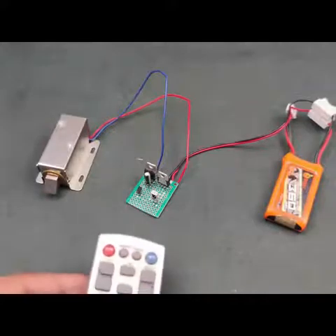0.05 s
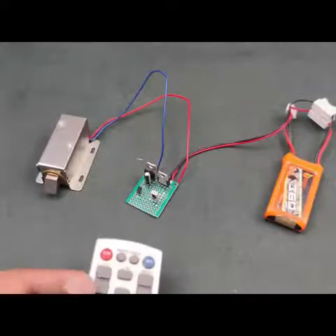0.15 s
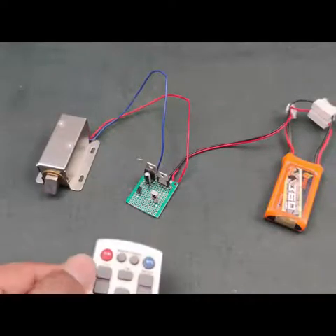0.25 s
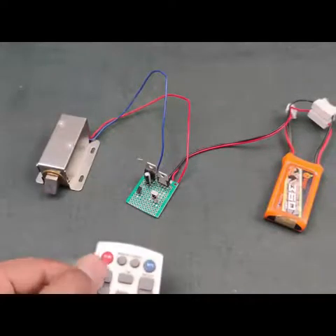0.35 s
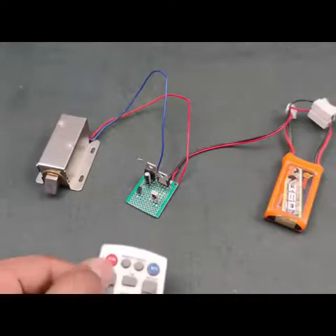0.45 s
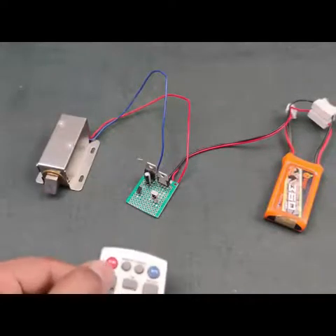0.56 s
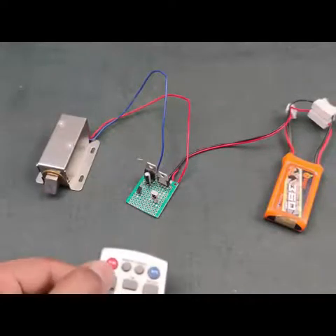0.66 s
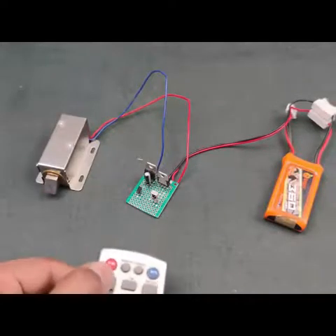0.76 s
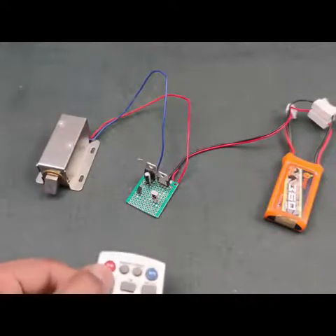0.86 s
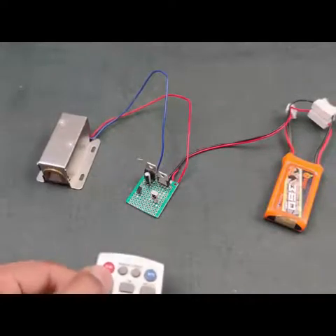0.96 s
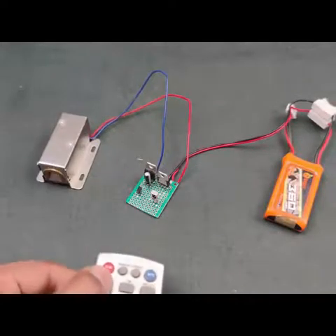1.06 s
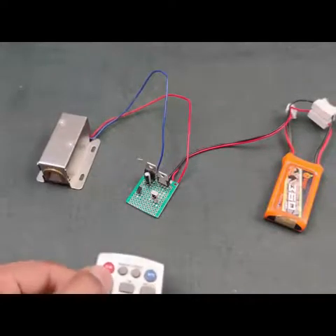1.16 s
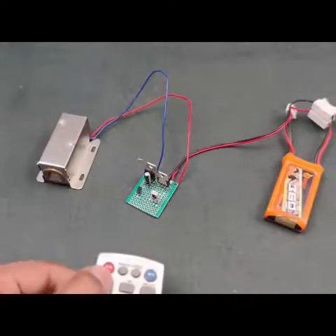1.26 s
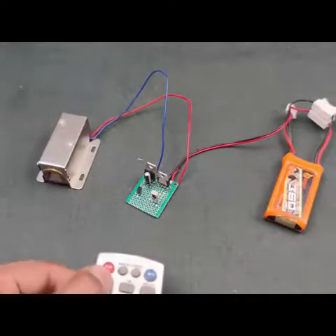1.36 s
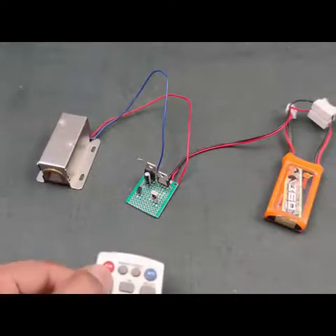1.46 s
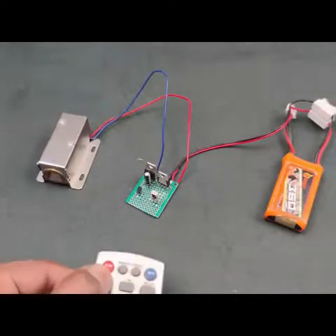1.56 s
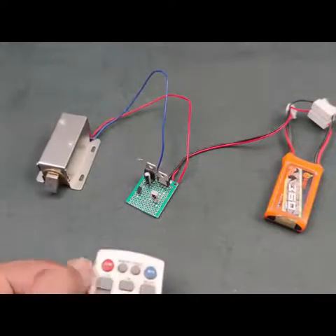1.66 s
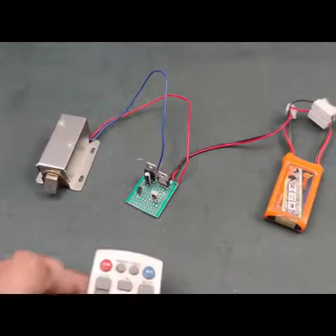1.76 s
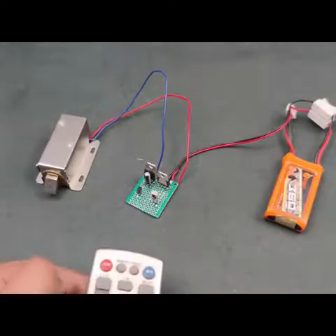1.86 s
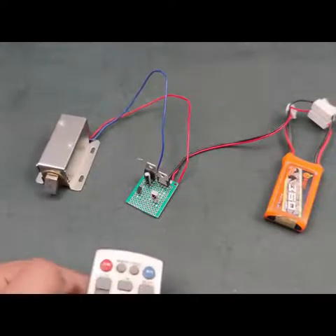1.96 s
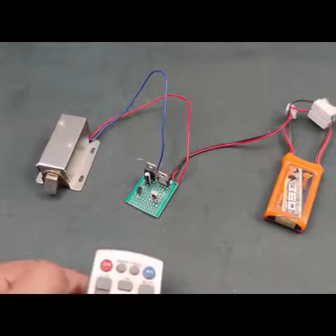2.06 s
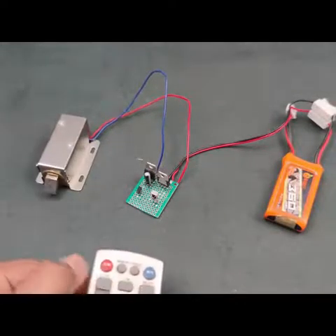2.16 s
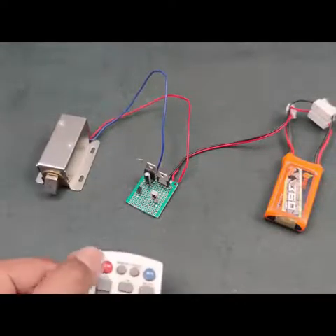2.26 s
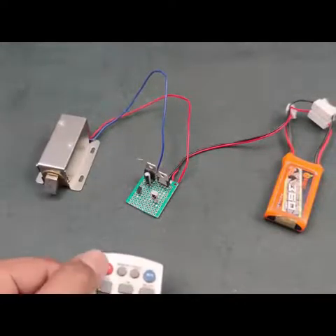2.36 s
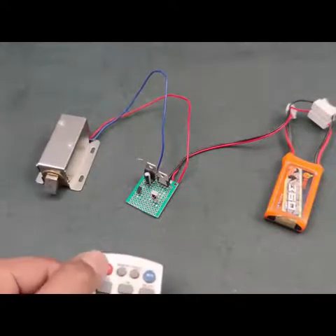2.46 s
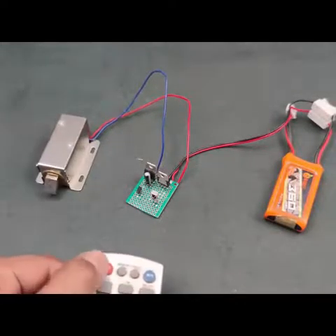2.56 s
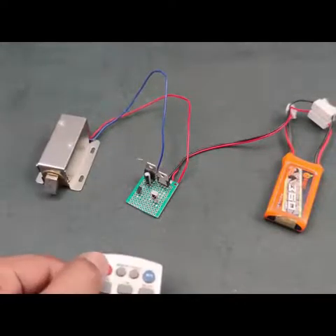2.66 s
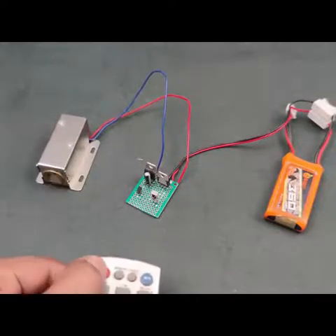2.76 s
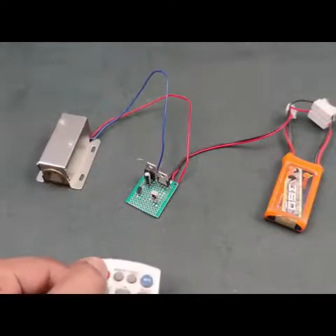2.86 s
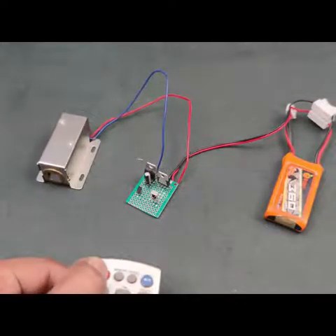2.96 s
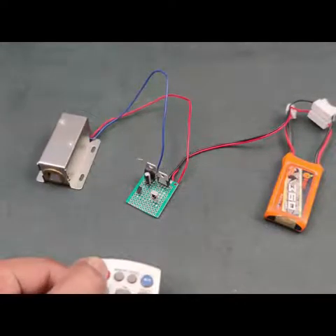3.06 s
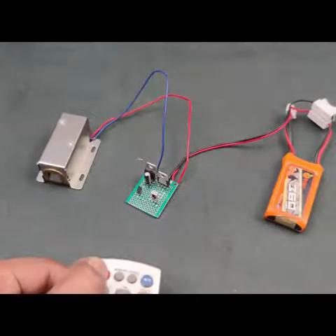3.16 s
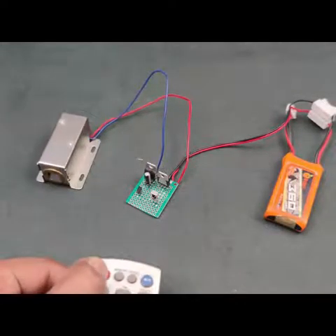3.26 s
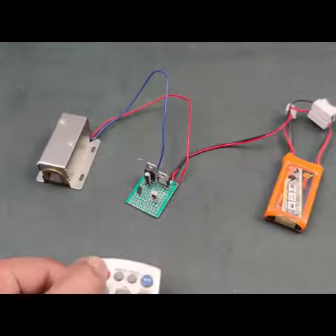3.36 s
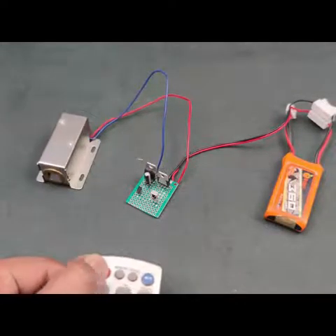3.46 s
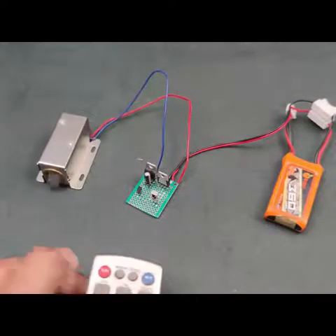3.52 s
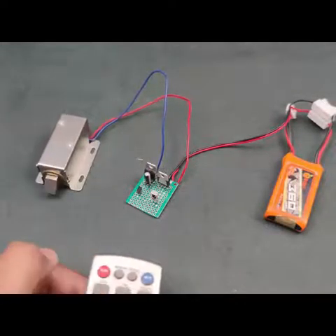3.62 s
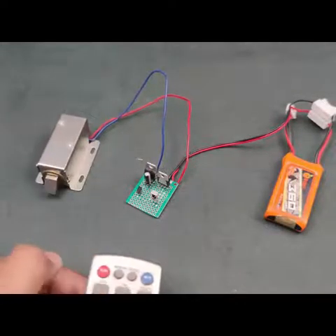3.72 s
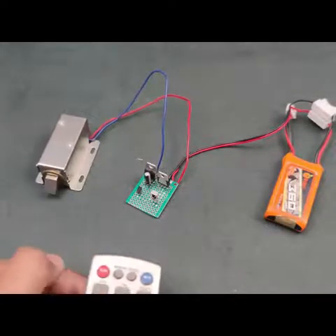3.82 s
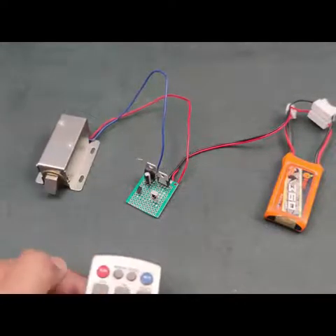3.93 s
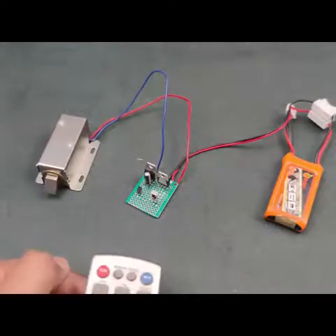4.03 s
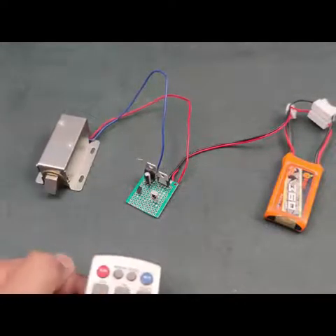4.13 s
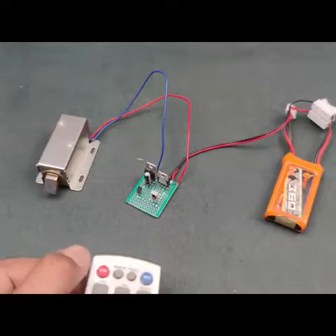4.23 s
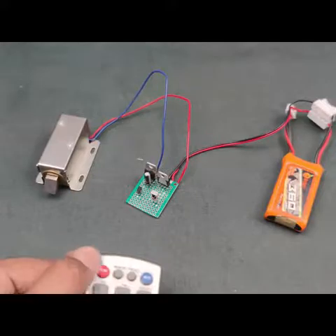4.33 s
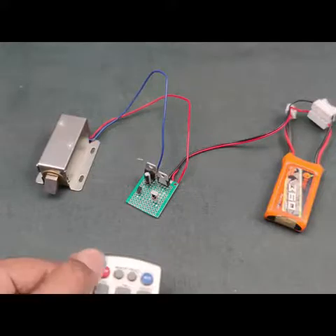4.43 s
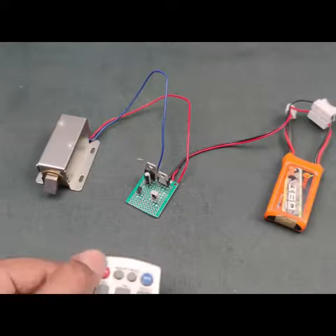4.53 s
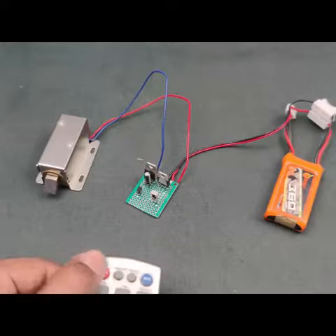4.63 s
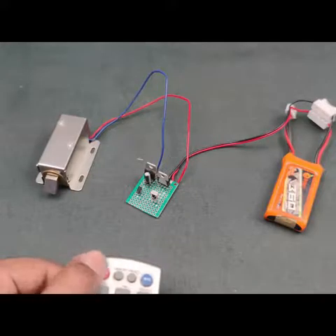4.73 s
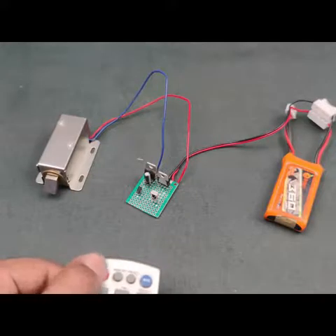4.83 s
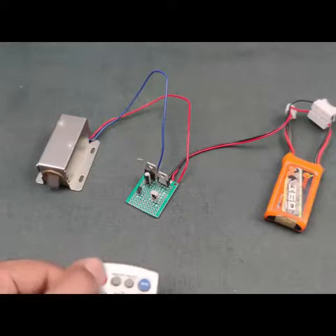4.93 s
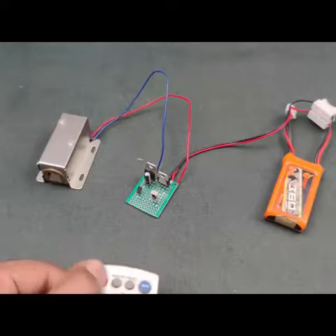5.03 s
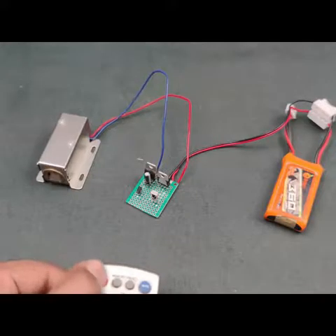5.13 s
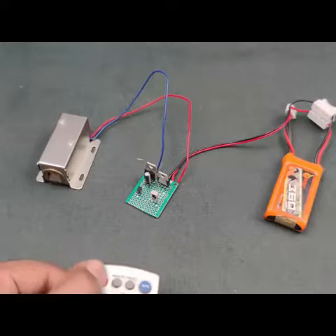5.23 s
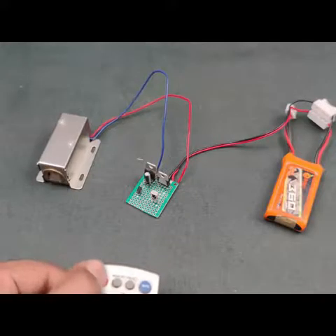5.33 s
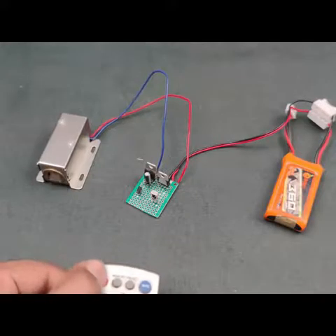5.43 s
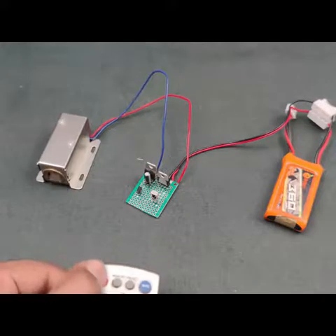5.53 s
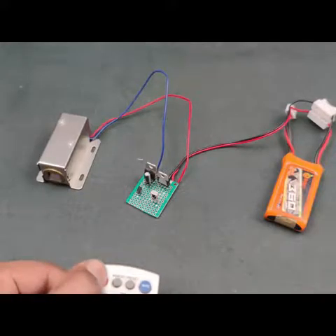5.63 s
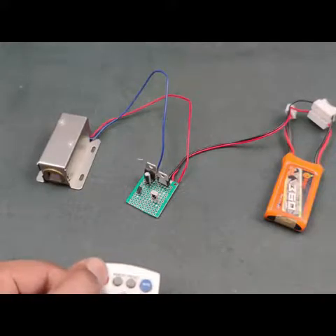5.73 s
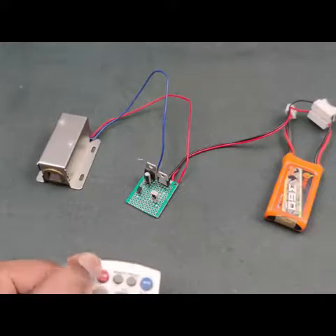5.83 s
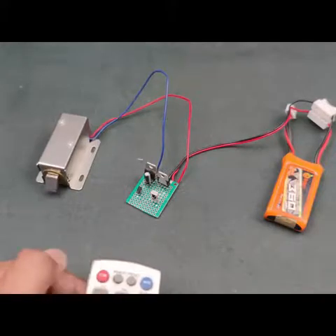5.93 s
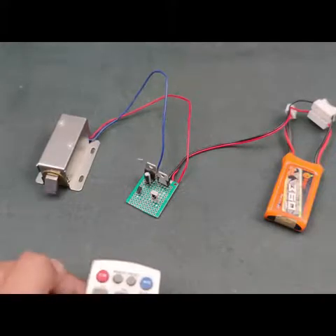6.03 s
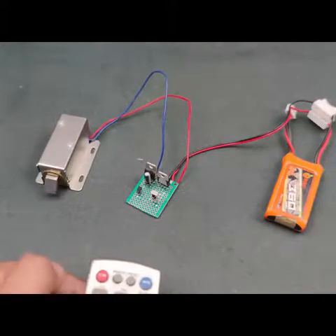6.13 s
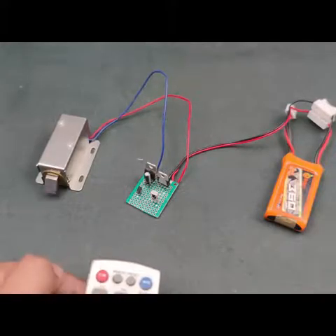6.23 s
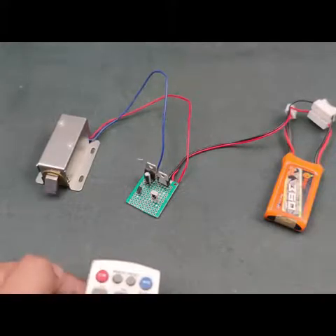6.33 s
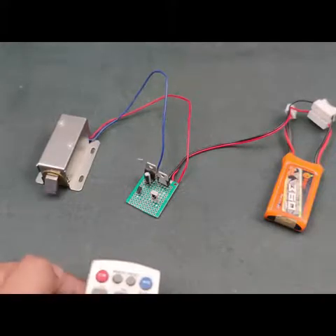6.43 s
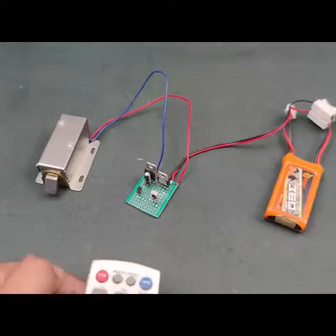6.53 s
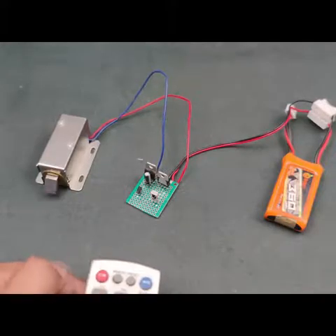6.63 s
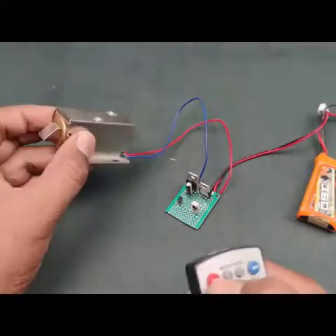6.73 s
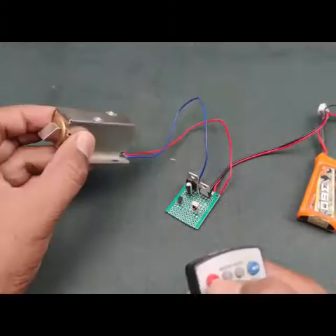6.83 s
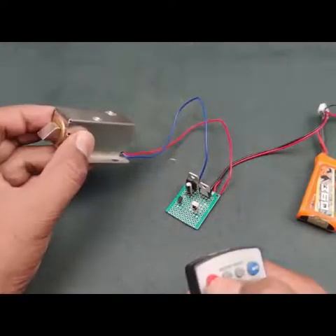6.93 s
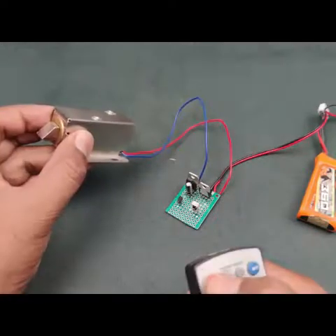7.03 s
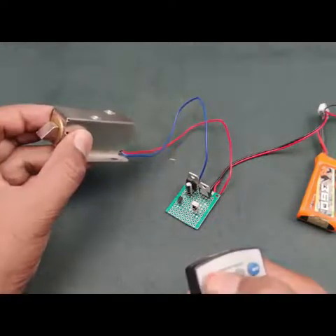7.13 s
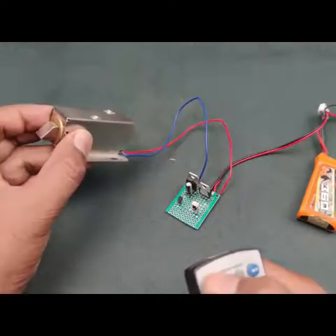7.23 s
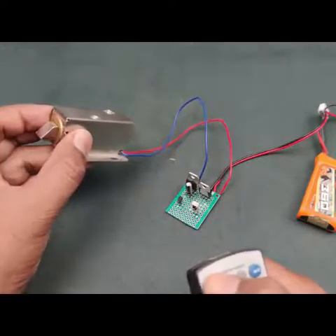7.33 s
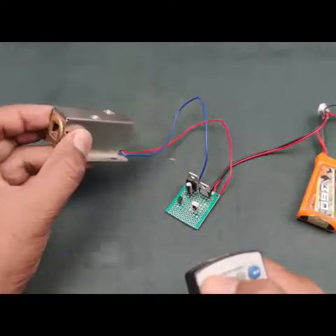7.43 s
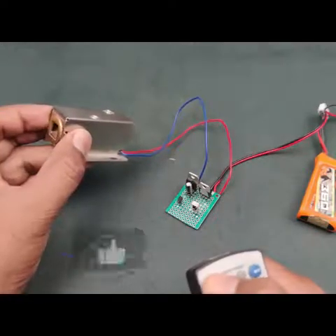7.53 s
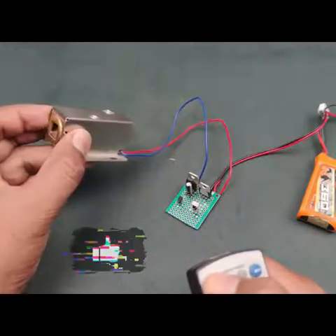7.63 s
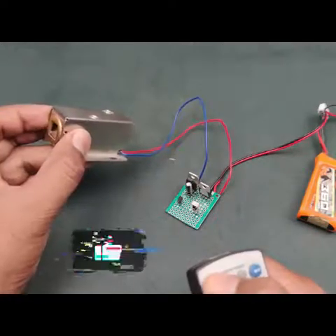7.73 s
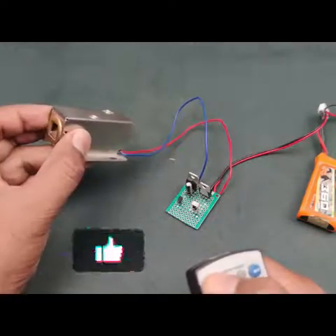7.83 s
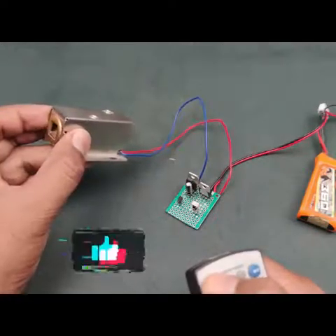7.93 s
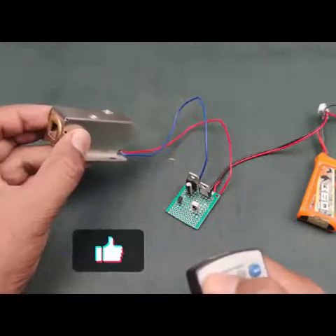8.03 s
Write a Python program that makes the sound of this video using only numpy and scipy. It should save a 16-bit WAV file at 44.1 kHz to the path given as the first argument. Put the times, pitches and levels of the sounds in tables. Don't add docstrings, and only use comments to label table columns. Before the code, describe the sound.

A small steel solenoid bolt clacks sharply in and springs back with a bouncing rattle, three times on a bench, then once more in the hand.

```python
import sys
import numpy as np
from scipy import signal
from scipy.fft import rfft, irfft, next_fast_len
from scipy.io import wavfile
from scipy.ndimage import uniform_filter1d, map_coordinates

SR = 44100
rng = np.random.default_rng(int(sys.argv[2]) if len(sys.argv) > 2 else 0)


def bounce(signal):
    frames = np.transpose(np.atleast_2d(signal))
    limited = np.clip(frames, -1, 1)
    pcm = np.round(limited * 32767).astype(np.int16)
    wavfile.write(sys.argv[1], SR, pcm)


def voltage_ratio(decibels):
    exponent = np.asarray(decibels, float) / 20
    return 10 ** exponent


N = 356328

# time in s, level in dB.
PULLS = [
    (1.0128, -9.5),
    (2.89, -9.5),
    (5.065, -9.5),
]
# time in s, level in dB, relative flight time of the bounces.
BACKS = [
    (1.788, -14.5, 1.08),
    (3.669, -14, .98),
    (6.0654, -14.5, .97),
]
# time in s, level in dB.
HELD_PULL = [(7.5483, -9)]

# time from the slam in s, steel in dB relative to it,
# bench in dB over steel, chatter length in ms.
PULL_CONTACTS = [
    (-.034, -37, -1, 6.5),
    (0, 0, -5.5, 7),
    (.0096, -10, -2, 5),
]
BACK_CONTACTS = [
    (0, 0, -1, 5),
    (.0092, -8.5, 2, 6),
    (.027, -17.5, 12, 8),
]
RELEASE_CONTACTS = [(-.0155, -19.5, -7, 5)]
HELD_CONTACTS = [
    (-.0223, -49, -14.5, 5),
    (0, 0, -32.5, 6.8),
]

# (start, stop) in s from the slam, steel in dB relative to it,
# bench in dB relative to it, delay of the steel in ms.
PULL_SLIDE = ((-.0395, .0045), -53, -40.5, 1.5)
BACK_SLIDE = ((-.026, .001), -26, -33, 10)
HELD_SLIDE = ((-.03, -.003), -44, -62, 1.5)

# frequency in Hz, width in Hz, level in dB.
PULL_MODES = [(2270, 59, -4.5), (2590, 300, -5.5), (3100, 200, -9), (3655, 400, -3.5), (4160, 250, -7.5),
              (4550, 75, -6), (4970, 370, -0.5), (5340, 130, -5), (5820, 170, -6.5), (6590, 300, -4),
              (7400, 86, -8.5), (8250, 1200, -1.5), (9500, 310, -6), (9300, 250, -6.5), (10250, 400, -8),
              (11500, 660, -10), (12500, 200, -9.5), (12900, 300, -11.5), (13500, 500, -11.5),
              (15200, 300, -14)]
# frequency in Hz, width in Hz, level in dB.
BACK_MODES = [(2300, 140, -3.5), (2560, 130, -1.5), (2980, 300, -3.5), (3600, 200, -12), (4100, 360, -10),
              (4930, 200, -5.5), (5572, 100, 0), (6750, 280, -19), (7900, 230, -12), (8200, 370, -10),
              (8800, 250, -13), (9850, 450, -14), (11400, 790, -15), (12200, 400, -18), (13300, 400, -20.5),
              (14600, 400, -28)]
# frequency in Hz, width in Hz, level in dB.
HELD_MODES = [(950.7, 140, -12.5), (1540, 260, -17.5), (2140, 510, -16), (2710, 220, -19), (3300, 140, -17),
              (3965, 220, -1.5), (4800, 360, -6.5), (5530, 130, -6), (6000, 210, -5), (6500, 200, 0),
              (7640, 170, -6), (8103, 110, 0), (8760, 210, -0.5), (8900, 200, -2.5), (9600, 320, -5),
              (10150, 490, -6), (10900, 300, -16), (12160, 590, -7.5), (13300, 490, -12.5),
              (14100, 320, -6.5), (14900, 220, -20)]
# frequency in Hz, width in Hz, level in dB.
SPRING_MODES = [(3600, 800, -19), (4870, 330, -2), (5730, 400, -3.5), (8300, 1200, -8), (11200, 1600, -10),
                (13500, 1500, -13.5)]
# frequency in Hz, width in Hz, level in dB.
BENCH_MODES = [(160, 41, -14.5), (308, 32, -5.5), (310, 15, -9), (434, 13, -3.5), (617, 55, -4),
               (731, 70, 3), (825, 34, 2), (1126, 99, -3.5), (1326, 49, -12.5), (1612, 99, -4),
               (1820, 130, -7)]
# frequency in Hz, width in Hz, depth from 0 to 1.
PULL_GAPS = [(3430, 150, 0.99), (4430, 120, .6), (6080, 250, .4), (3075, 110, 0.7), (7070, 300, 0.8),
             (10600, 140, 1)]
# frequency in Hz, width in Hz, depth from 0 to 1.
BACK_GAPS = [(2125, 350, .7), (3750, 90, 0.98), (4620, 130, .5), (5900, 260, 0.43), (5250, 91, 0.4),
             (6900, 350, 0.47)]
# frequency in Hz, width in Hz, depth from 0 to 1.
HELD_GAPS = [(1286, 340, .7), (4520, 110, .4), (5416, 150, 0.67), (6640, 140, 0.97), (11100, 200, .5)]
# frequency in Hz, level after a pull in dB,
# level after a spring back in dB, t60 in s.
LOW_MODES = [(66, -52, -63, 1.1), (88.5, -51.5, -58.5, .9), (93, -46, -46.5, 1.1), (111.7, -50, -45, 1.4),
             (135.7, -48, -49.5, .8), (170, -49, -54.5, 0.43), (187, -54, -54.5, 0.85),
             (210, -51, -46, 0.86)]

# time in s, level in dB, thud in dB over the tick, chatter length in ms.
KEY_TICKS = [(.849, -69, 3.5, 4), (.42, -57, -5.5, 8.4), (.91, -54.5, -7, 4.3), (1.71, -67.5, 6.5, 3.7),
             (2.415, -67.5, 9.5, 4), (2.796, -53.5, -6.5, 4), (4.969, -66.5, -1.5, 4),
             (5.971, -59.5, -2.5, 4.03), (7.474, -54, 7, 4.9)]
# frequency in Hz, width in Hz, level in dB.
KEY_MODES = [(2620, 200, -3), (2860, 170, -1), (5590, 110, -7), (5800, 110, -11.5), (7700, 200, -2.5),
             (8760, 360, -8.5), (10100, 190, -12)]
# time in s, level in dB, thud in dB over the tap, chatter length in ms.
TAPS = [
    (6.747, -56.5, -8.5, 5.6),
    (6.753, -49.5, -14, 7.9),
]
# frequency in Hz, width in Hz, level in dB.
TAP_MODES = [(1400, 260, -4.5), (2500, 120, 3.5), (3190, 200, -10), (4130, 310, -7), (5430, 270, -6.5),
             (8200, 680, -12), (12000, 1800, -26)]
# start in s, hold in s, level in dB, time to fall 15 dB in s.
STROKES = [
    (.01, .17, -63.5, 0.58),
    (0.424, .11, -62, 0.02),
    (2.64, .14, -74, 0.9),
]
# frequency in Hz, density in dB per Hz.
SKIN_SPECTRUM = [(120, -43), (200, -13.5), (339, 5), (392, -20.5), (446, -8), (677, -9.5), (1260, -10),
                 (4580, -22.5), (7000, -32), (8400, -20), (15500, -32.5)]

# frequency in Hz, t60 in s.
WALL_T60 = [(120, 0.71), (300, 0.62), (1500, 0.63), (6000, .55), (12000, 0.44)]
# frequency in Hz, level in dB.
WALL_TONE = [(100, -2.5), (300, 0), (800, -4), (2000, 8.5), (5000, -2.5), (9000, 0), (15000, -5.5)]
# frequency in Hz, correlation from -1 to 1.
PORT_LIKENESS = [(60, 1), (180, 1), (550, 0.69), (1650, -0.56), (4970, -0.1), (15000, 0.32)]
# frequency in Hz, density in dB per Hz.
HUSH_SPECTRUM = [(12, -33.5), (20, -6.5), (96, -3), (200, -10), (340, -13.5), (750, -19.5), (1400, -23.5),
                 (2500, -27), (5000, -34.5), (6800, -40.5), (8300, -35.5), (10500, -34.5), (13500, -34.5),
                 (16300, -39.5)]
# time in s, level in dB, frequency in Hz.
THUMPS = [(.47, -61, 110), (0.521, -58, 140), (7.03, -57, 60), (7.11, -61, 50), (4.142, -49.5, 38.4),
          (4.574, -60, 93)]
# frequency in Hz, start in s, end in s, level in dB.
WHINE = (779.5, 4, 5, -78.5)
# frequency in Hz, width in Hz, level in dB.
PORTS = [(8330, 730, 7), (6400, 1000, 6.5)]
# frequency in Hz, width in Hz, depth from 0 to 1.
PORT_SHADOW = (8400, 3900, 1)


def lock():
    pull = np.add(chatter(blows(PULLS, PULL_CONTACTS), period_ms=1.8, depth=0.6),
                  slide(slides(PULLS, PULL_SLIDE)))
    free = np.add(chatter(blows(BACKS, RELEASE_CONTACTS), period_ms=2.3, depth=0.28),
                  slide(slides(BACKS, BACK_SLIDE)))
    held = np.add(chatter(blows(HELD_PULL, HELD_CONTACTS), period_ms=1.5, depth=0.18),
                  slide(slides(HELD_PULL, HELD_SLIDE)))
    back = chatter(blows(BACKS, BACK_CONTACTS), period_ms=1.4, depth=0.46)
    sound = struck(pull, PULL_MODES, fill_db=-16, gaps=PULL_GAPS, wet_db=1.5)
    sound += struck(back, BACK_MODES, fill_db=-19, gaps=BACK_GAPS, wet_db=-1.0)
    sound += struck(held, HELD_MODES, fill_db=-29.5, gaps=HELD_GAPS, wet_db=-2.5)
    sound += struck(free, SPRING_MODES, fill_db=-24.5, wet_db=-3.0)
    return sound


def blows(slams, pattern):
    rows = []
    for s, db, *flight in slams:
        for after, rel_db, bench_db, ms in pattern:
            stretch = flight[0] if flight and after > 0 else 1
            rows.append((s + after * stretch, db + rel_db, bench_db, ms))
    return rows


def slides(slams, pattern):
    (start, stop), steel_db, bench_db, lag_ms = pattern
    return [(s + start, s + stop, db + steel_db, db + bench_db, lag_ms) for s, db, *_ in slams]


def chatter(rows, period_ms, depth):
    steel, bench = np.zeros((2, 3, N))
    t = np.arange(SR // 40) / SR * 1000
    for s, db, bench_db, ms in rows:
        rise = 1 - np.exp(-t / .2)
        span = rise * np.exp(-t / 12) / (1 + (t / ms) ** 8)
        rebounds = span * unit(1 - depth + depth * np.exp(-(t % period_ms) / .35))
        at = round(s * SR)
        for force, gain in [(steel, voltage_ratio(db - 3.5)), (bench, voltage_ratio(db + bench_db - 3.5))]:
            force[:2, at:at + len(t)] += gain * even(rebounds)
            force[2, at + round(ms * SR / 2000)] += gain * np.linalg.norm(rebounds)
    return steel, bench


def even(envelope):
    burst = envelope * rng.standard_normal((2, len(envelope)))
    for _ in range(6):
        z = rfft(burst)
        white = irfft(z / (np.abs(z) + 1e-12), len(envelope))
        burst = envelope * white / np.sqrt(uniform_filter1d(white ** 2, size=24, axis=1) + 1e-12)
    return burst


def slide(rows):
    steel, bench = np.zeros((2, 3, N))
    for start, stop, steel_db, bench_db, lag_ms in rows:
        at = slice(round(start * SR), round(stop * SR))
        t = np.arange(at.stop - at.start) / SR
        u = t / (stop - start)
        grit = rng.standard_normal((2, 3, SR // 10))[..., :len(t)]
        steel_onset = np.clip((t - lag_ms / 1000) / 0.0032, 0, 1) ** 2
        bench_onset = np.clip(u / 0.23, 0, 1)
        steel[:, at] = steel_onset * voltage_ratio(steel_db + 3.9 * u + 12 * u ** 12) * grit[0]
        bench[:, at] = bench_onset * voltage_ratio(bench_db + 9 * u + 2.7 * u ** 8) * grit[1]
    return steel, bench


def struck(forces, steel_peaks, fill_db, gaps=(), wet_db=0):
    steel, bench = forces
    bench = np.array([bench[0] + .3 * bench[1], bench[0] - 0.27 * bench[1], bench[2]])
    f, casing = body(steel_peaks, fill_db)
    bench_top = body(BENCH_MODES, fill_db=-15)[1]
    cancel = np.prod([1 - np.clip(d, 0, 1) * mode(f, c, w) for c, w, d in gaps], axis=0)
    rings = irfft(np.array([casing, bench_top]) * cancel)[:, None, :4096]
    sound = np.zeros((3, N))
    step = SR // 4
    for k in range(0, N, step):
        pair = np.array([steel[:, k:k + step], bench[:, k:k + step]])
        if pair.any():
            part = signal.fftconvolve(pair, rings, axes=2).sum(0)[:, :N - k]
            sound[:, k:k + part.shape[1]] += part
    return sound * voltage_ratio([[0], [0], [wet_db]])


def body(peaks, fill_db):
    f = np.fft.rfftfreq(16384, 1 / SR)
    floor = np.abs(mode(f, np.sqrt(peaks[0][0] * peaks[-1][0]), peaks[-1][0])) ** 4
    power = sum(np.abs(voltage_ratio(db) * mode(f, c, w)) ** 2 for c, w, db in peaks)
    power = power + voltage_ratio(2 * fill_db) * floor
    cep = irfft(.5 * np.log(power / power.mean() + 1e-9))
    cep[1:len(f) - 1] *= 2
    cep[len(f):] = 0
    return f, np.exp(rfft(cep))


def mode(f, hz, width):
    return 1j * f * width / (hz * hz - f * f + 1j * f * width)


def boom():
    out, t = np.zeros(N + SR), np.arange(SR) / SR
    hz, pull_db, back_db, t60 = np.transpose(LOW_MODES)[:, :, None]
    for rows, level in [(PULLS, pull_db), (BACKS, back_db)]:
        for s, *_ in rows:
            knots = rng.standard_normal((len(LOW_MODES), 12))
            waver = np.array([np.interp(t, np.linspace(0, 1, 12), k) for k in knots])
            decay = voltage_ratio(level + 2.2 * waver - 60 * t / t60)
            ring = (decay * np.sin(2 * np.pi * hz * t + 1.8 * waver[::-1])).sum(0)
            push = voltage_ratio(level[0] + 11 - 60 * t / .05) * np.sin(2 * np.pi * 40 * t)
            out[round(s * SR):][:SR] += ring * (1 - np.exp(-t / 0.0035)) + push
    return out[:N]


def keys_and_tap():
    keys = struck(chatter(KEY_TICKS, period_ms=2.3, depth=.5), KEY_MODES, fill_db=-12, wet_db=-5)
    tap = struck(chatter(TAPS, period_ms=3.8, depth=0.32), TAP_MODES, fill_db=-19.5, wet_db=4.5)
    return keys + tap


def skin_on_plastic():
    rise_s = .012
    t = np.arange(N) / SR
    level = np.zeros(N)
    for s, hold, db, fall in STROKES:
        onset = np.clip((t - s) / rise_s + 1, 0, 1) ** 2
        level += onset * voltage_ratio(db - 15 * np.clip(t - s - hold, 0, 8 * fall) / fall)
    skin = unit(filtered(rng.standard_normal((2, N)), lambda hz: voltage_ratio(along(SKIN_SPECTRUM, hz))))
    return voltage_ratio(1.5 + 1.9 * wander(25)) * level * skin


def room(x):
    ripple_db = 2.2
    out, step = np.zeros((2, N + 3 * SR)), int(.9 * SR)
    for k in range(0, N, step):
        hz, t, z = signal.stft(rng.standard_normal((2, SR)), SR, nperseg=256)
        fade = voltage_ratio(-60 * t / along(WALL_T60, hz)[:, None] + along(WALL_TONE, hz)[:, None])
        fade *= voltage_ratio(rng.normal(-0.35, ripple_db, (len(hz), 1)))
        tail = paired(signal.istft(z * fade, SR, nperseg=256)[1][:, :SR], PORT_LIKENESS)
        first_echo = np.clip((np.arange(SR) / SR - .004) / 0.0013, 0, 1)
        tail *= first_echo / np.sqrt(SR / 24)
        wet = signal.fftconvolve(x[None, k:k + step], tail, axes=1)
        out[:, k:k + wet.shape[1]] += wet
    return out[:, :N]


def paired(a, alike):
    def turn(hz):
        return np.arccos(np.clip(along(alike, hz), -1, 1)) / 2
    mid, side = filtered(a, lambda hz: np.array([np.cos(turn(hz)), np.sin(turn(hz))]))
    return np.array([mid + side, mid - side])


def hush():
    hush_db, sway_db = -67.5, 1.8
    air = unit(filtered(rng.standard_normal((2, N)), lambda hz: voltage_ratio(along(HUSH_SPECTRUM, hz))))
    low = filtered(air, lambda hz: 1 / (1 + (hz / 250) ** 2))
    swaying = air + low * (voltage_ratio(sway_db * wander(6)) - 1)
    t = np.arange(N) / SR
    thumps = np.zeros(N)
    for s, db, hz in THUMPS:
        thumps += voltage_ratio(db) * np.exp(-((t - s) / 0.015) ** 2) * np.sin(2 * np.pi * hz * (t - s))
    return voltage_ratio(hush_db + 3.5) * swaying + thumps


def whine():
    hz, start, end, db = WHINE
    t = np.arange(N) / SR
    drift = np.cumsum(rng.standard_normal(N)) * 0.015
    passing = np.sqrt(np.sin(np.pi * np.clip((t - start) / (end - start), 0, 1)).clip(0))
    return voltage_ratio(db) * passing * np.sin(2 * np.pi * hz * t + drift)


def wander(rate_hz):
    return map_coordinates(rng.standard_normal(int(N * rate_hz / SR) + 4), [np.arange(N) * rate_hz / SR])


def unit(x):
    return x / np.sqrt(np.mean(x ** 2) + 1e-20)


def along(points, hz):
    f, v = np.transpose(points)
    return np.interp(np.log(hz + 1), np.log(f + 1), v)


def filtered(x, response):
    n = x.shape[-1]
    m = 2 * next_fast_len(n // 2 + 4096)
    return irfft(rfft(x, m) * response(np.fft.rfftfreq(m, 1 / SR)), m)[..., :n]


def scene():
    bolt, taps = lock(), keys_and_tap()
    near = voltage_ratio([[-.6], [.6]]) * bolt[:2] + taps[:2] + skin_on_plastic()
    return near + room(bolt[2] + taps[2]) + boom() + hush() + whine()


def gated(x, hole_db, from_hz):
    hz, _, z = signal.stft(x, SR, nperseg=1024)
    power = np.mean(np.abs(z) ** 2, 0)
    power = uniform_filter1d(uniform_filter1d(power, size=4, axis=0), size=4, axis=1)
    level = 10 * np.log10(np.abs(power) + 1e-20)
    margin = uniform_filter1d(level, size=40, axis=0) + hole_db - level
    weak = np.clip(margin + .5, 0, 1)
    weak = np.repeat(np.repeat(weak[2::4, 1::3], 4, axis=0), 3, axis=1)
    mask = np.zeros(z.shape[1:])
    mask[:weak.shape[0], :weak.shape[1]] = weak[:z.shape[1], :z.shape[2]]
    treble = level[190:210].mean(0)
    treble = treble - treble.max()
    mask[hz > 15250] = (treble > -24) * (treble < -5)
    lost = z * mask * (hz[:, None] > from_hz)
    return x - signal.istft(lost, SR, nperseg=1024)[1][:, :N]


def band_limit(x):
    return signal.sosfilt(signal.butter(12, 16970, fs=SR, output="sos"), x)


def record(dry):
    (left_hz, left_w, left_db), (right_hz, right_w, right_db) = PORTS
    shadow_hz, shadow_w, shadow_depth = PORT_SHADOW

    def ports(f):
        left = 1 + (voltage_ratio(left_db) - 1) * mode(f, left_hz, left_w)
        right = 1 + (voltage_ratio(right_db) - 1) * mode(f, right_hz, right_w)
        right = right * (1 - shadow_depth * mode(f, shadow_hz, shadow_w))
        return np.array([left, right]) / np.sqrt(1 + (f / 15750) ** 160)

    heard = filtered(dry, ports)
    heard = heard / (1 + np.abs(heard / .95) ** 4) ** .25
    mix = gated(heard, hole_db=-4, from_hz=2476)
    return band_limit(mix)


dry = scene()
out = record(dry)
bounce(out)
```